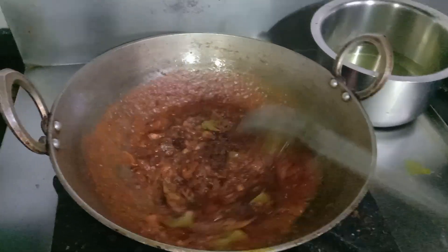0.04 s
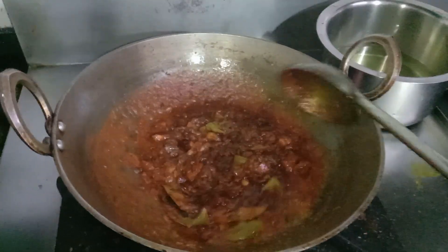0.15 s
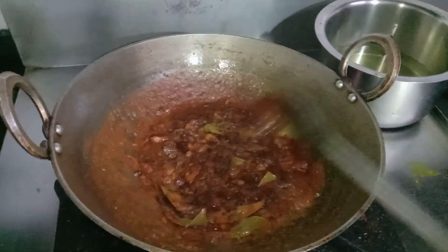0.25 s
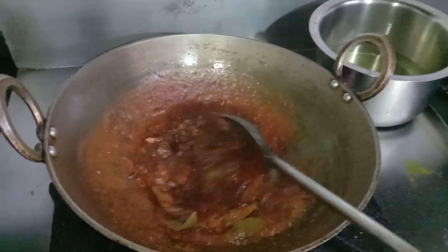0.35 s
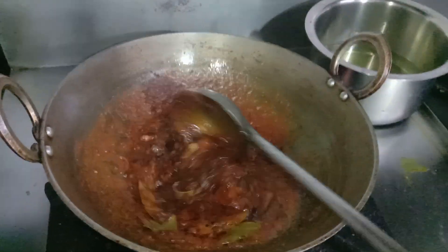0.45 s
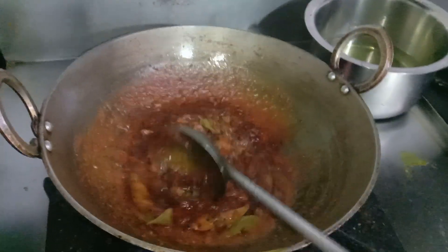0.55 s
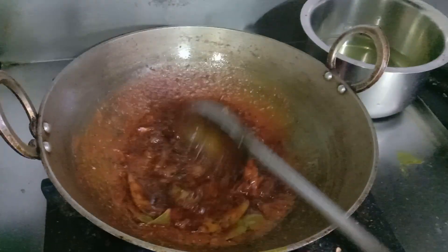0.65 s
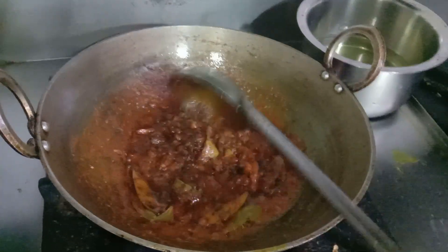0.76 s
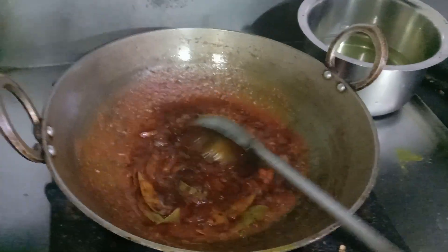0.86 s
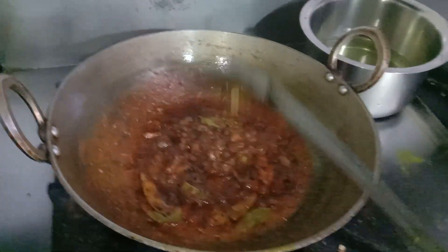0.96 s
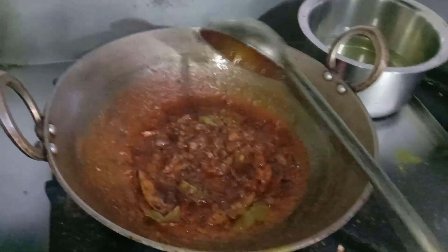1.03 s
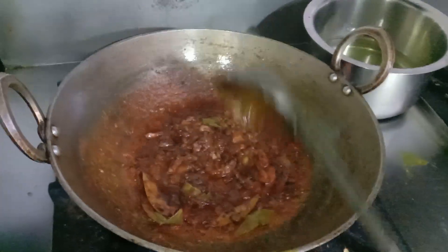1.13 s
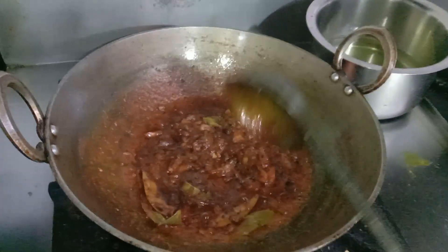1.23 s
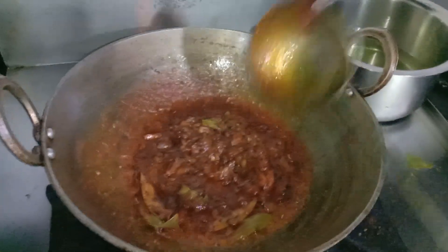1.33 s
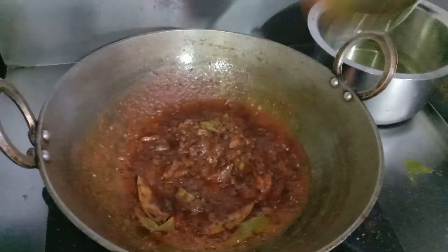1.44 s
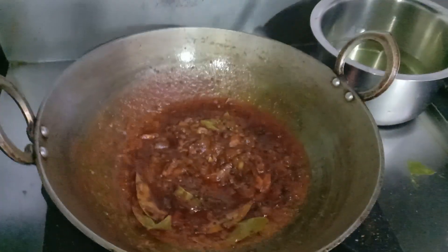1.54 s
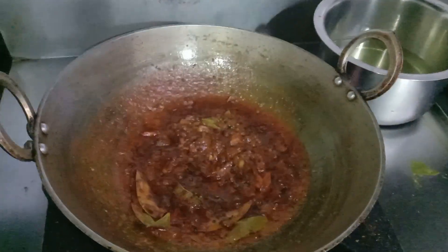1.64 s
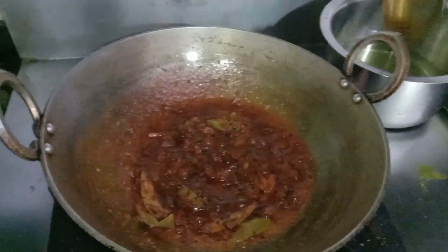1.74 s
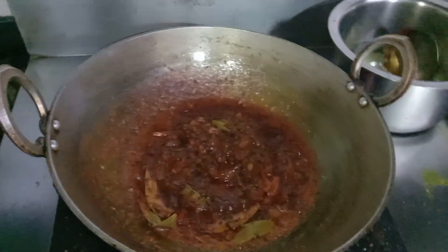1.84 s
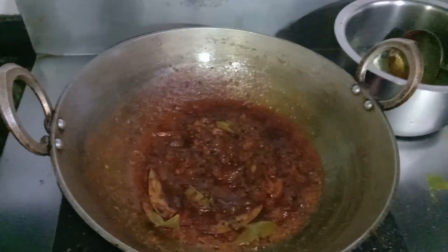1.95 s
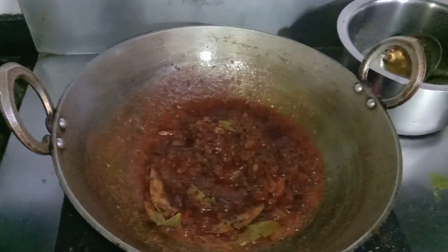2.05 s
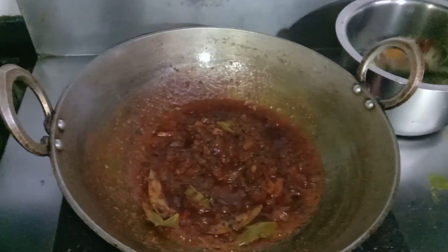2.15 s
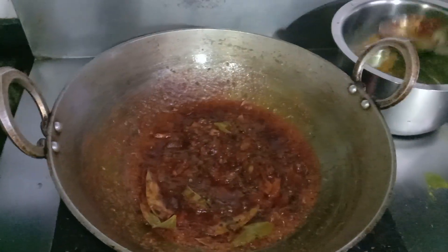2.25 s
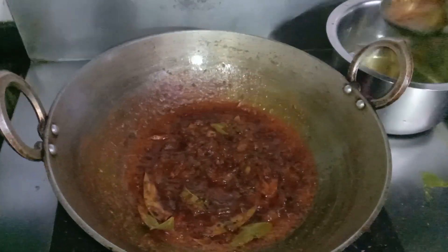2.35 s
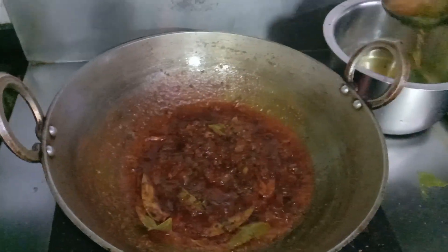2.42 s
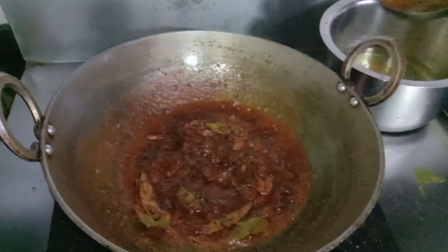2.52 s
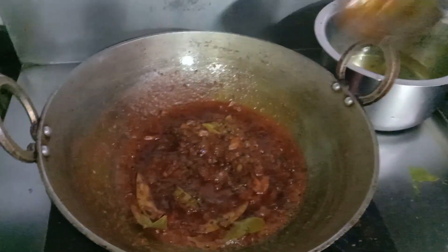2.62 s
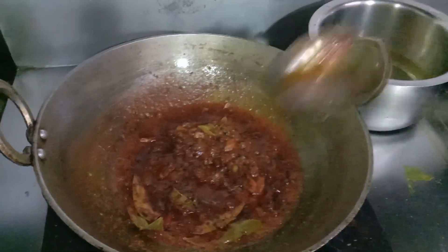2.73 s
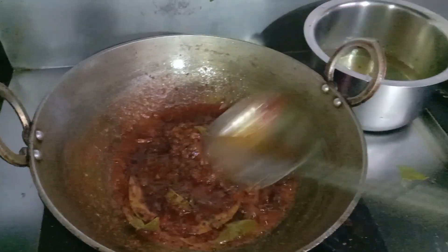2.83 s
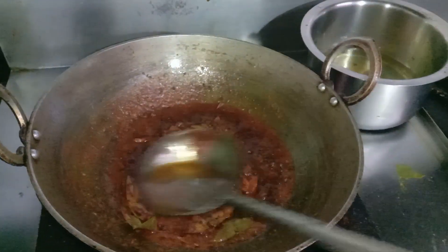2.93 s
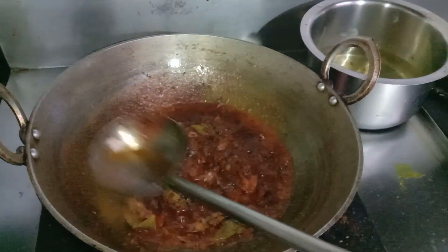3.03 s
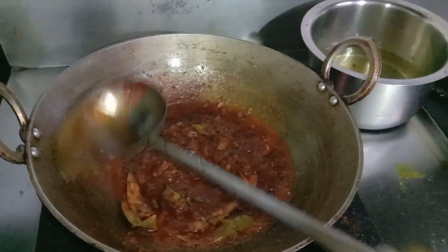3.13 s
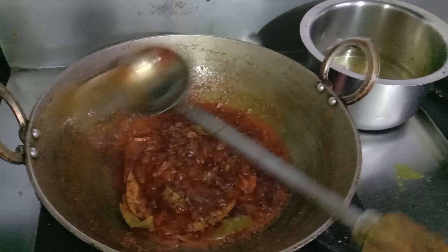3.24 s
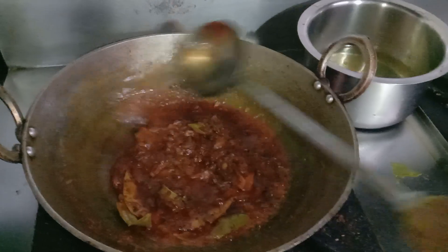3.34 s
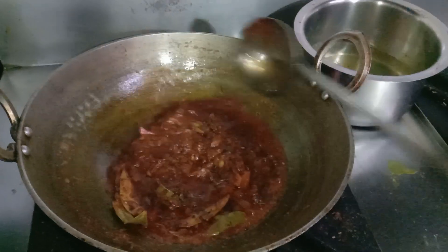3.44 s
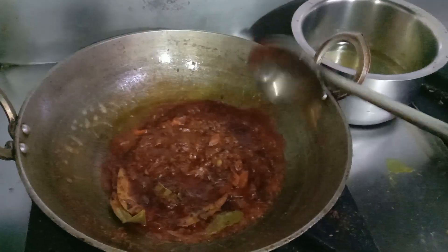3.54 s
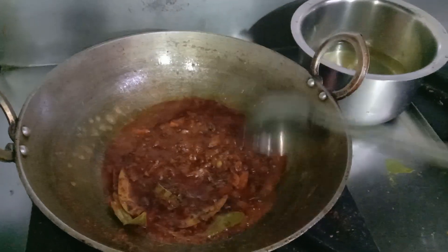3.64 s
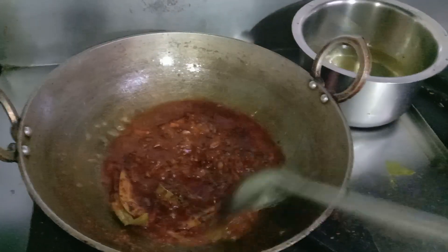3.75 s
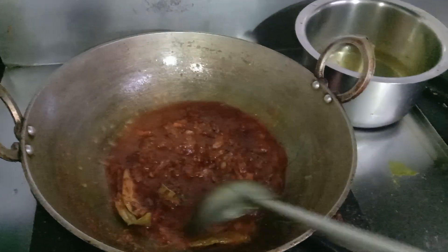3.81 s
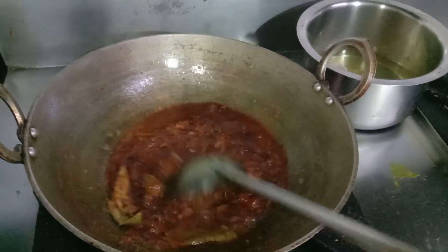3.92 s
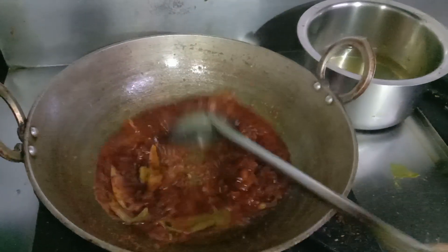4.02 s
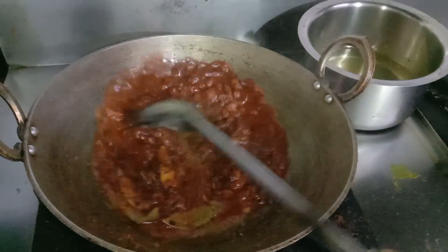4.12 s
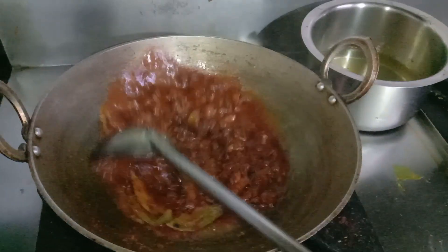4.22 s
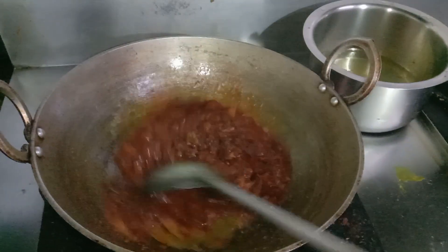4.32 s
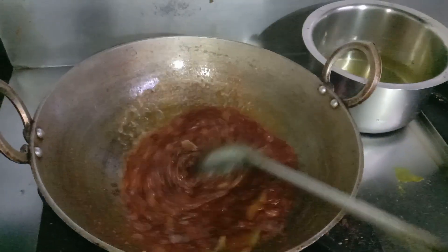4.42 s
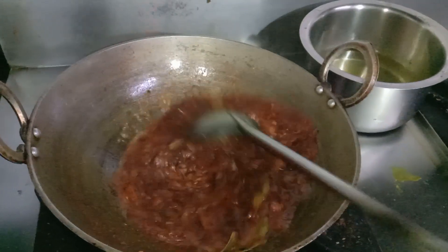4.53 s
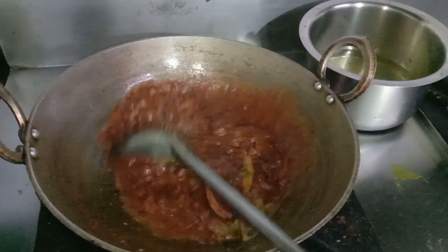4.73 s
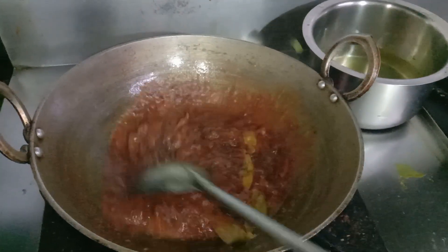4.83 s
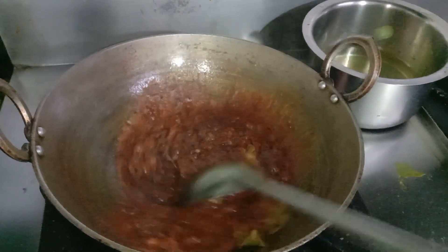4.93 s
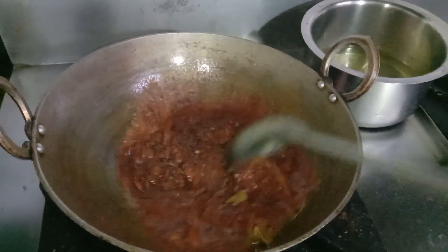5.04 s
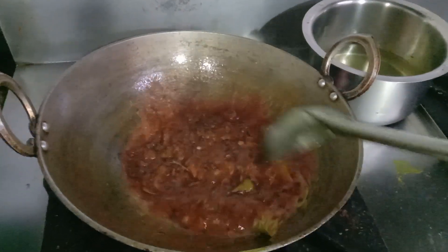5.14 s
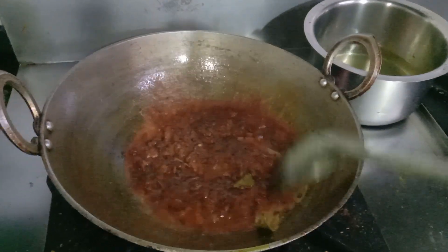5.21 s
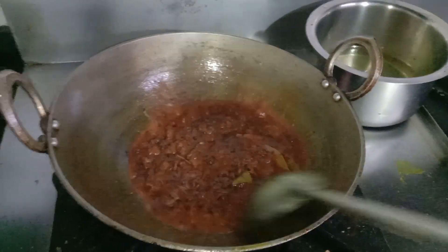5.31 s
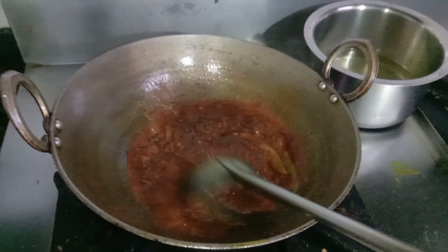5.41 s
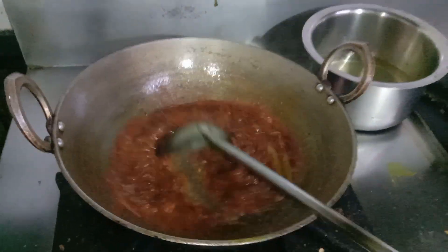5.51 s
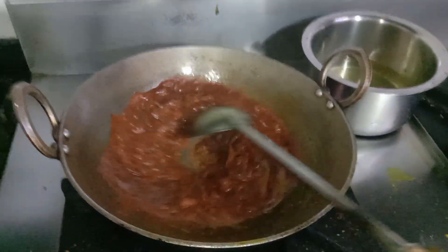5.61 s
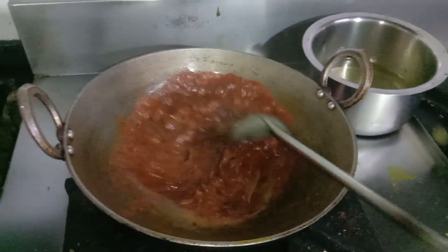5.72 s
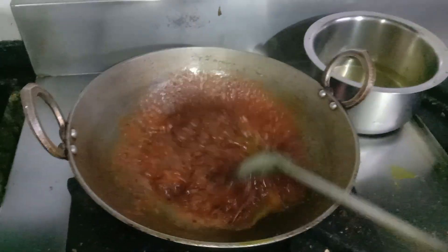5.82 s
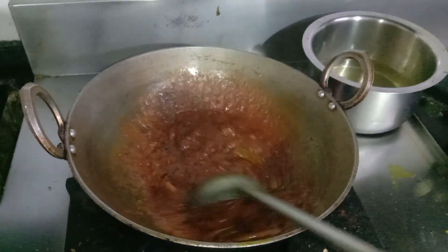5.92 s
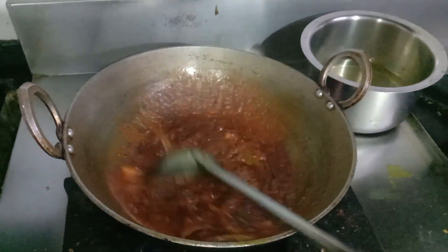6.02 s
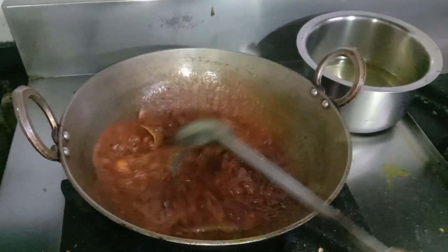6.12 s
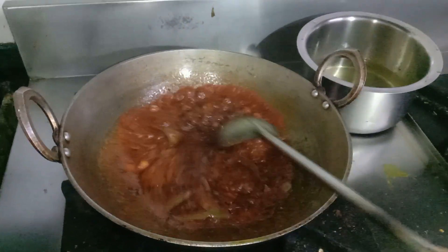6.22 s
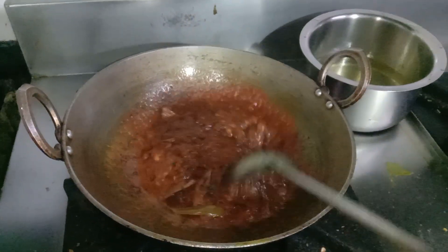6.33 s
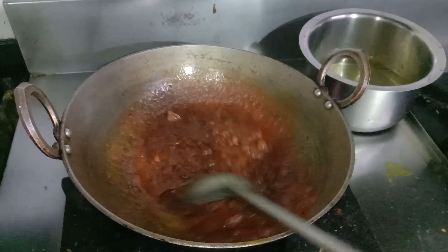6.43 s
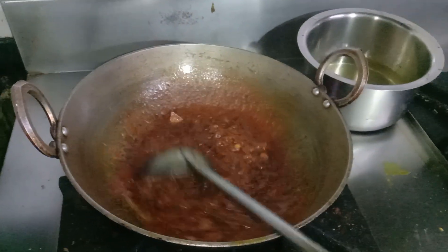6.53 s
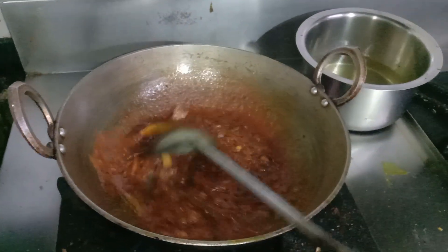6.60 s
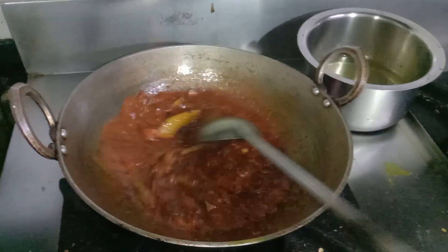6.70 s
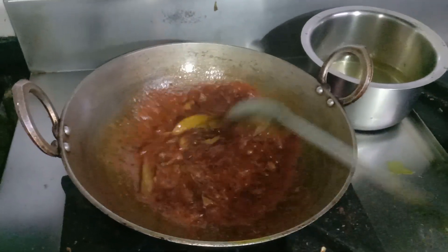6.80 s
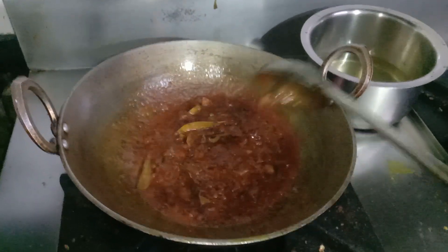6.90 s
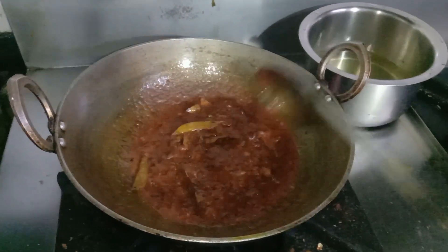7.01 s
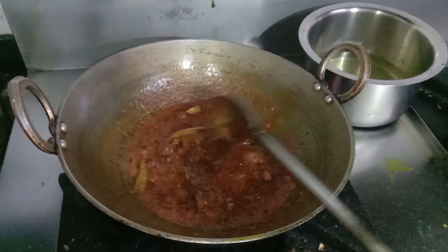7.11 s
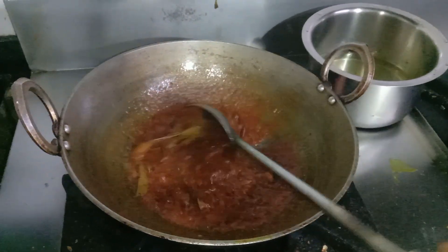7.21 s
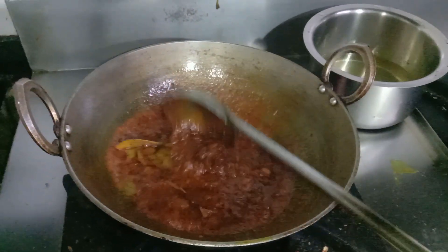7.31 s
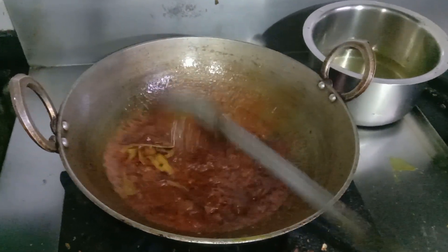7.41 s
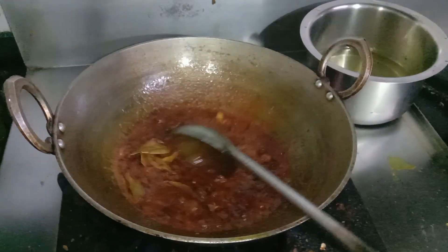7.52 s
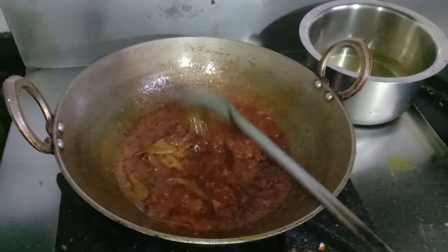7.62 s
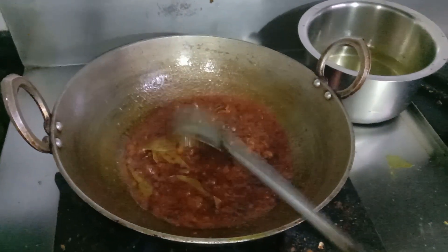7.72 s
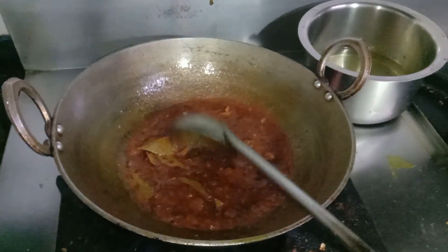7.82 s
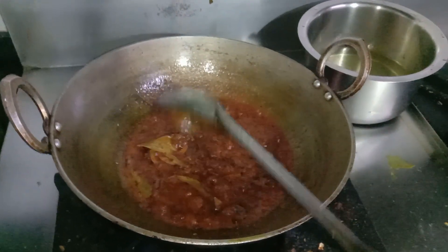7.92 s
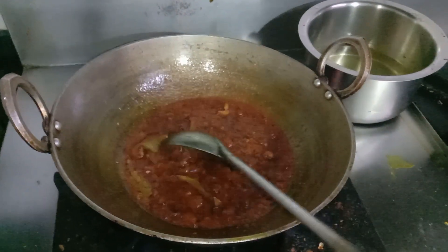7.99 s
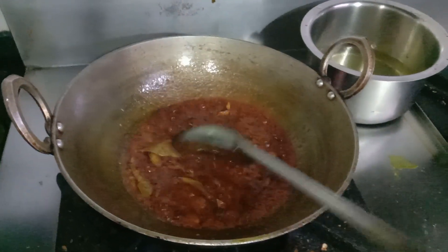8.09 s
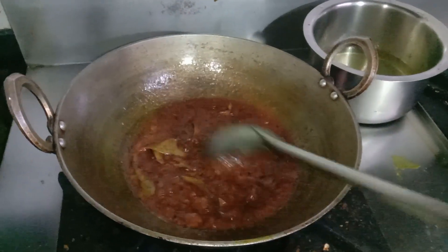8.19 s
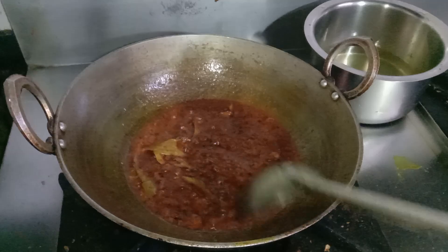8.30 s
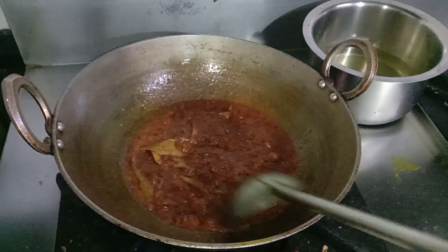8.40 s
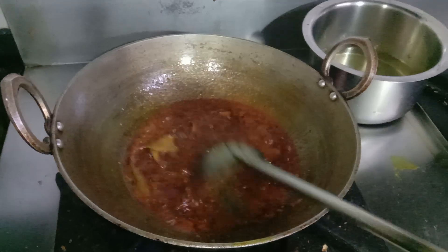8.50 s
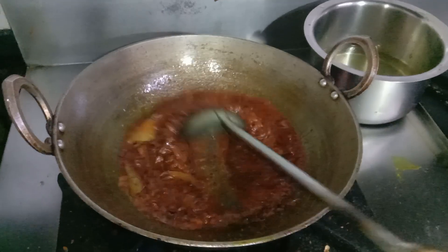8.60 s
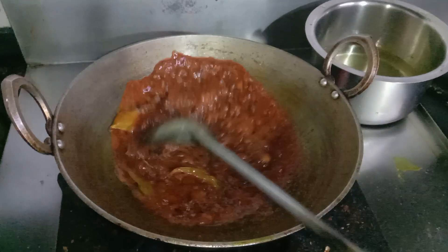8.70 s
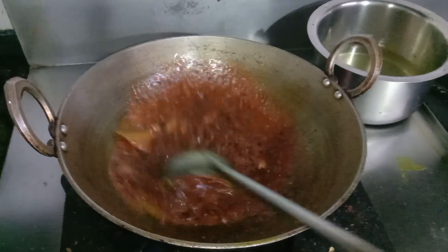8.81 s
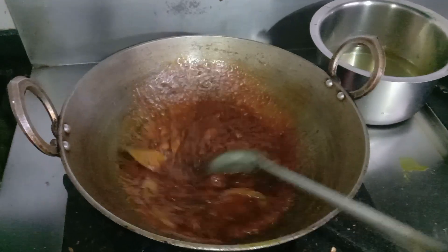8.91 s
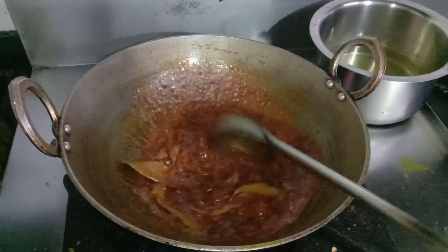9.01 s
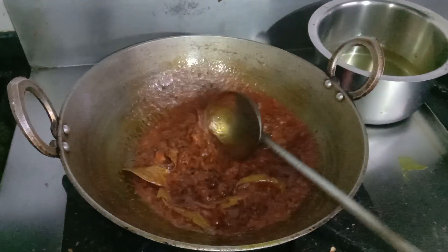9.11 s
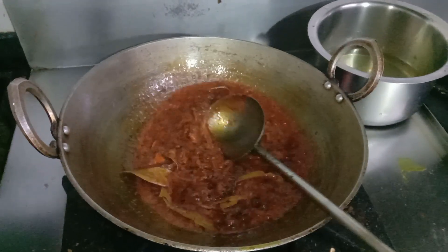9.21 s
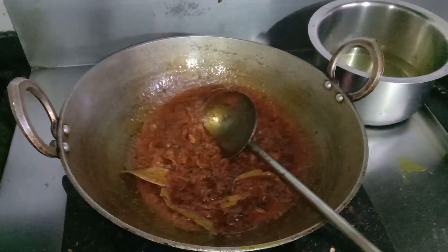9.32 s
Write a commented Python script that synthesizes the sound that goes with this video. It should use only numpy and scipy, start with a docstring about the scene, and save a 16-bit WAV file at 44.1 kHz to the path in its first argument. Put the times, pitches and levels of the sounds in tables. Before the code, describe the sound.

A steel ladle knocks against an iron wok over softly sizzling sauce, then lightly taps a steel pot. The sizzle swells as liquid meets the hot wall, and the ladle stirs with repeated dull knocks and scrapes. Near the end come several sharper, ringing taps and a few more strokes. A gas flame roars faintly underneath, all heard close by in a small kitchen.

```python
"""A dull knock on iron over sizzling: a steel ladle stirs sauce in a wok on a gas stove in a small kitchen.
Each impact excites the resonances of wok and stove top; a few leave the ladle's own modes ringing,
and its dragged rim scrapes by stick-slip friction. The ladle taps a steel pot, then liquid meets the
hot wall and the sizzle swells with bursting steam and ringing bubbles. The flame roars softly beneath."""
import sys
import numpy as np
from scipy import signal
from scipy.fft import rfft, irfft
from scipy.io import wavfile
from scipy.ndimage import uniform_filter1d

SR = 44100
rng = np.random.default_rng(int(sys.argv[2]) if len(sys.argv) > 2 else 0)


def transcribe(signal):
    """Save signal, clipped to [-1, 1], as a 16-bit WAV file at the path in sys.argv[1]."""
    frames = np.atleast_2d(signal).T
    limited = np.clip(frames, -1, 1)
    pcm = np.round(limited * 32767).astype(np.int16)
    wavfile.write(sys.argv[1], SR, pcm)


N = 412328
RING_T = np.arange(SR) / SR  # the one second that a blow lasts

# broad spectrum of the iron wok: frequency_hz, level_db
WOK_SPECTRUM = [(150, -35.5), (500, -20.5), (850, -6), (1100, -3), (1290, -1.5), (1500, -8.5),
                (1800, -11.5), (2600, -20), (4500, -83), (9000, -63)]
# resonances of the wok and its stand: pitch_hz, width_hz, peak_db
WOK_MODES = [(105, 18, 7), (348, 22, 4), (506, 50, 3), (590, 25, 4), (635, 38, 9.5), (785, 40, 9),
             (885, 30, 3), (990, 35, 5), (1071, 30, 5), (1245, 45, 6), (1305, 40, 8)]


def amp(db):
    """Decibels to amplitude ratio."""
    return 10 ** (np.asarray(db) / 20)


def unit_rms(x, first=None):
    """Normalises the rms of a signal, or of its first samples, to 1."""
    return x / np.sqrt(np.mean(x[:first] ** 2) + 1e-20)


def curve_at(points, hz):
    """Interpolation on a logarithmic frequency axis."""
    knots_hz, values = np.transpose(points)
    return np.interp(np.log(hz + 1), np.log(knots_hz + 1), values)


def add(mix, start_s, sound):
    """Superposition: a sound joins the mix at start_s."""
    part = mix[max(0, round(start_s * SR)):][:len(sound)]
    part += sound[:len(part)]


def colour(x, spectrum, modes=()):
    """Minimum-phase filtering by a broad spectrum with resonance peaks on top."""
    hz = np.fft.rfftfreq(8192, 1 / SR)
    peaks_db = sum(db / (1 + (2 * (hz - centre) / width) ** 2) for centre, width, db in modes)
    gain = amp(np.maximum(curve_at(spectrum, hz) + peaks_db, -100))
    cepstrum = irfft(np.log(gain))
    half = len(cepstrum) // 2
    causal = np.r_[cepstrum[0], 2 * cepstrum[1:half], np.zeros(half)]
    response = irfft(np.exp(rfft(causal)))[:half]
    return signal.oaconvolve(x, response)[:len(x)]


def soften(x, contact_hz):
    """Contact time limits bandwidth: a cushioned blow lasts longer and loses its treble."""
    return colour(x, [(contact_hz, 0), (2 * contact_hz, -11), (4 * contact_hz, -25)])


def decay(t60_s):
    """Exponential damping, 60 dB in t60_s."""
    return amp(-60 * RING_T / t60_s)


def ring(modes):
    """Free vibration: a sum of damped modes whose shares vary with where the blow lands."""
    draws = rng.random((len(modes), 2))
    return sum(amp(db) * (.5 + share) * decay(t60_s) * np.sin(2 * np.pi * (hz * RING_T + phase))
               for (hz, db, t60_s), (share, phase) in zip(modes, draws))


def pops(per_s, spread_db):
    """Shot noise: random clicks; spread_db makes a few much larger than the rest."""
    strength = amp(spread_db * np.minimum(rng.exponential(1, N), 6))
    return unit_rms(strength * rng.choice([-1, 1], N) * (rng.random(N) < per_s / SR))


def wander(depth_db, samples):
    """Random amplitude modulation: a gain that drifts over about this many samples."""
    drift = uniform_filter1d(rng.standard_normal(N), samples)
    return amp(depth_db * unit_rms(uniform_filter1d(drift, samples // 2)))


def kitchen(x):
    """Reverberation: dense reflections off hard walls die at a rate that depends on frequency."""
    # reverberation time: frequency_hz, t60_s
    decay_times = [(100, 0.84), (600, 0.55), (1300, 0.95), (3000, 0.51), (7000, 0.75), (15000, 0.51)]
    reflections = rng.standard_normal(SR) * (rng.random(SR) < .06) * (RING_T > .008)
    hz, t, spectra = signal.stft(reflections, SR, nperseg=256)
    absorption = amp(-60 * t / curve_at(decay_times, hz)[:, None])
    tail = signal.istft(spectra * absorption, SR, nperseg=256)[1]
    return signal.fftconvolve(x, tail / np.linalg.norm(tail))[:N]


def burner(level_db=-49.5):
    """Combustion noise: the soft, steady roar of the gas flame."""
    # flame spectrum: frequency_hz, level_db
    flame_spectrum = [(15, -61), (25, -32), (60, -12.5), (147, -2), (220, -18.5), (240, -17.5), (334, -9),
                      (384, -24), (426, -13), (636, -7), (917, -39), (1070, -7), (1600, -13.5), (2080, -34),
                      (3520, -120)]
    return amp(level_db) * unit_rms(colour(rng.standard_normal(N), flame_spectrum))


def bubbling():
    """Bubble resonance: each size rings at its own pitch for about ten cycles, rising slightly."""
    out = np.zeros(N)
    for hz in np.geomspace(1500, 6500, 32):
        cycles = hz * RING_T[:800]
        blip = np.sin(2 * np.pi * cycles * (1 + .003 * cycles)) * np.exp(-cycles / 7)
        births, onsets = np.zeros(N), rng.integers(0, N, size=2500)
        births[onsets] = amp(2.2 * np.minimum(rng.exponential(1, len(onsets)), 5))
        out += signal.oaconvolve(births, unit_rms(blip))[:N]
    return unit_rms(out)


def bubble_clusters(x, depth_db):
    """Spectral modulation: passing clusters of bubbles of one size lift narrow bands for a moment."""
    spectra = signal.stft(x, nperseg=1024, noverlap=768)[2]
    patches = uniform_filter1d(rng.standard_normal(spectra.shape), size=5, axis=0)
    patches = uniform_filter1d(patches, size=9, axis=1)
    spectra *= amp(depth_db * unit_rms(patches))
    return unit_rms(signal.istft(spectra, nperseg=1024, noverlap=768)[1][:N])


def wetness(start_s, spread_s, drying_db_per_s):
    """Evaporation: a patch of liquid spreads over the hot iron, then boils away."""
    t = np.arange(N) / SR - start_s
    return np.clip(t / spread_s, 0, 1) * amp(-drying_db_per_s * np.maximum(t - spread_s, 0))


def frying_envelopes():
    """Incoherent sources add in power: each wet patch raises the boil and the fizz above a simmer."""
    # liquid poured or pushed up the hot wall: start_s, spread_s, boil_db, fizz_db, drying_db_per_s
    wettings = [(-.2, 0.18, -38, -40.5, 7.5), (1.2, .55, -49, -52, 8), (3.21, 0.27, -33, -40.5, 3.5),
                (3.92, 0.4, -32, -41.5, 6), (5.42, .4, -38.5, -42.5, 9.5), (6.9, .12, -42.5, -49, 20),
                (8.44, 0.14, -40.5, -45, 20), (8.83, 0.092, -44, -47, 21)]
    boil_lag_s = .074  # the oil spits at once, the sauce boils up a moment later
    boil_power, fizz_power = amp(-51) ** 2, amp(-62) ** 2  # the simmer
    for start_s, spread_s, boil_db, fizz_db, drying in wettings:
        boil_power += (amp(boil_db) * wetness(start_s + boil_lag_s, spread_s, drying)) ** 2
        fizz_power += (amp(fizz_db) * wetness(start_s, spread_s, drying)) ** 2
    return np.sqrt(boil_power), np.sqrt(fizz_power)


def sizzle():
    """Boiling noise: steam crackles and bubbles through the sauce; finer bursts fizz in the oil."""
    # spectra of the boiling sauce and the spitting oil: frequency_hz, level_db
    sauce_spectrum = [(530, -25.5), (900, -2), (1020, -6), (1270, 1), (1550, -14.5), (2240, -3.5),
                      (2830, -8.5), (3510, -9.5), (4400, -18.5), (5210, -10), (5780, -11), (6290, -19),
                      (8500, -32.5), (11000, -47), (18700, -120)]
    oil_spectrum = [(3000, -24), (5300, -22), (6600, -9), (8200, -13), (9400, -1), (10700, 3), (12000, -2),
                    (13700, -9), (15000, -4), (16000, -2.5)]
    # the wok resonance that the frying drives: pitch_hz, width_hz, peak_db
    wok_hum = [(1260, 61, 3)]
    crackle = (pops(7000, spread_db=2) + .79 * bubbling()) * wander(.38, samples=1800)
    sauce = unit_rms(colour(bubble_clusters(crackle, depth_db=2.3), sauce_spectrum, wok_hum))
    spray = pops(8000, spread_db=2) * wander(1, samples=3000)
    oil = unit_rms(colour(bubble_clusters(spray, depth_db=2), oil_spectrum))
    boil, fizz = frying_envelopes()
    return boil * sauce + amp(3.5) * fizz * oil


def scrape():
    """Stick-slip friction: tiny slips of the ladle's rim excite the wok in uneven clumps."""
    # drags of the rim over the iron: start_s, length_s, level_db
    drags = [(0, 0.68, -48), (3.834, 1.7, -32.5), (5.349, 1.4, -34.5), (7.05, .35, -40), (7.6, .6, -44),
             (8.35, 0.18, -22.5), (8.613, .14, -37.5), (9.09, 0.2, -38.5)]
    attack_s, ease_db_per_s, release_s = .05, 4.5, .084  # the hand presses, eases off and lifts
    pressure = np.zeros(N)
    for start_s, length_s, level_db in drags:
        t = np.maximum(np.arange(N) / SR - start_s, 0)
        lift = np.exp(-np.maximum(t - length_s, 0) / release_s)
        pressure += np.minimum(t / attack_s, 1) * amp(level_db - ease_db_per_s * t) * lift
    slips = pops(2500, spread_db=0) * wander(2.1, samples=900)
    return pressure * unit_rms(colour(slips, WOK_SPECTRUM, WOK_MODES + [(1249, 84, 9.6)]))


def rocking(samples=1500):
    """Oscillation about equilibrium: a few soft, low cycles as the wok settles."""
    # the wok rocks on its stand: start_s, level_db, pitch_hz
    rocks = [(0.073, -31.5, 145), (0.57, -33, 152), (0.843, -30.5, 124), (5.326, -26, 131)]
    out = np.zeros(N)
    for start_s, level_db, pitch_hz in rocks:
        sway = np.sin(2 * np.pi * pitch_hz * RING_T[:samples]) * signal.windows.hann(samples)
        add(out, start_s, amp(level_db) * sway)
    return out


def struck_modes():
    """Modal excitation: each point of impact drives the wok's resonances in different shares."""
    shares = rng.uniform(.3, 1.6, len(WOK_MODES))
    return [(hz, width, db * share) for (hz, width, db), share in zip(WOK_MODES, shares)]


def thud(bass_db):
    """Structure-borne sound: the wok chatters on its stand and the stove top booms."""
    # stove top spectrum: frequency_hz, level_db
    stove_spectrum = [(35, -34), (70, -10), (100, -4.5), (210, -2.5), (320, 0.5), (560, -1), (850, -2),
                      (1150, -1.5), (1500, -44), (2500, -25), (5000, -54)]
    chatter = rng.standard_normal(SR) * (decay(.12) + .84 * decay(.82)) * (1 - decay(.0091))
    weighted = colour(chatter, [(170, bass_db), (520, 0)])
    return unit_rms(colour(weighted, stove_spectrum, struck_modes()), first=2200)


def stove_bumps():
    """Soft contacts excite mainly low modes: the stove top booms faintly."""
    # bumps while the ladle is at the side pot: start_s, level_db
    bumps = [(1.848, -42.5), (2.43, -47.5), (2.92, -51)]
    out = np.zeros(N)
    for start_s, level_db in bumps:
        add(out, start_s, amp(level_db) * soften(thud(bass_db=5.5), contact_hz=300))
    return out


def pot():
    """Impact excitation: the dipping ladle bumps the side pot and sets its modes ringing."""
    # taps on the pot: start_s, ring_db, bump_db
    taps = [(1.881, -47, -33), (1.897, -34, -47), (2.049, -32, -40)]
    # modes of the steel pot: pitch_hz, level_db, t60_s
    pot_modes = [(735, -6.5, 0.33), (792, -8, 0.58), (1195, -9.5, 0.47), (1510, -11, .12), (1925, 3, .38),
                 (1984, -4, 0.28), (1990, -19, .15), (2250, -13, 0.7)]
    out = np.zeros(N)
    for start_s, ring_db, bump_db in taps:
        bump = unit_rms(colour(rng.standard_normal(SR), WOK_SPECTRUM)) * decay(.25)
        ringing = unit_rms(ring(pot_modes), first=900)
        add(out, start_s, amp(ring_db) * ringing + amp(bump_db) * bump)
    return out


def ladle():
    """Mode splitting: the ladle rings freely, and its uneven bowl gives each partial a detuned twin."""
    # modes of bowl and shaft: pitch_hz, level_db, t60_s
    ladle_modes = [(1690, 2, .4), (1965, -3, .5), (2492, -10, .5), (2697, -12, .5), (3031, 2, .75),
                   (3052, -1, .7), (3183, -1, .4), (3451, -8, .4), (3790, -9, .8), (3960, -9, .7),
                   (4176, -7, .7), (4235, -7, .7), (4310, -6, .6), (4645, -4, .75), (4815, -7, .7),
                   (5100, -7, .55), (5630, -8, .7), (5792, -4, .6), (5930, -7, .5), (6115, -8, .6),
                   (6250, -8, .45), (6730, -10, .5), (7300, -15, .4)]
    # rebounds, each favouring partials around a centre: start_s, level_db, centre_hz, spread_octaves
    rebounds = [(1.18, -30, 3000, .6), (6.941, -42, 5000, .8), (7.74, -29, 4200, .5),
                (7.986, -27.5, 3500, .33), (8.334, -23, 4900, .33), (9.208, -45, 4500, .5)]
    # bands that the bowl beams separately: low_hz, high_hz
    beam_bands = [(1700, 3600), (3600, 5000), (5000, 8000)]
    twin_detune, twin_db = .025, -3
    out = np.zeros(N)
    for start_s, level_db, centre_hz, spread_octaves in rebounds:
        modes = [(hz, db - 2 * (np.log2(hz / centre_hz) / spread_octaves) ** 2, t60_s)
                 for hz, db, t60_s in ladle_modes]
        twins = [(hz * (1 + twin_detune * rng.uniform(-1, 1)), db + twin_db, t60_s)
                 for hz, db, t60_s in modes]
        add(out, start_s, amp(level_db) * unit_rms(ring(modes + twins), first=1300))
    # directivity: waving in the hand, the bowl beams each band past the listener by turns
    filters = [signal.butter(2, edges, "band", fs=SR, output="sos") for edges in beam_bands]
    return sum(signal.sosfilt(band, out) * wander(2, samples=1100) for band in filters)


def clang(contact_hz, shiver_db):
    """Viscous damping: the sauce stops the wok within a few cycles; its bare wall shivers on."""
    push = signal.unit_impulse(SR) + .16 * rng.standard_normal(SR) * decay(.031)
    body = colour(push, WOK_SPECTRUM, [(1278, 230, 8.1)])
    blow = unit_rms(soften(body, contact_hz), first=530)
    wall = unit_rms(colour(rng.standard_normal(SR), WOK_SPECTRUM, struck_modes()))
    shiver = wall * decay(.7) * (1 - decay(.056))
    return blow + amp(shiver_db) * soften(shiver, contact_hz)


def clonk(contact_hz, pitch_hz=638.3, rise_s=.007):
    """Mass loading: the laden wok has a hollow note, which takes more of the push from a softer contact."""
    hz = pitch_hz * (1 + .05 * rng.uniform(-1, 1))  # the sloshing load shifts the note
    tone = np.sqrt(2) * np.sin(2 * np.pi * (hz * RING_T + rng.random()))
    swell = (1 - np.exp(-RING_T / rise_s)) * decay(.16)
    return pitch_hz / contact_hz * swell * tone


def clink(contact_hz):
    """A brief contact has a wide spectrum: steel on iron gives a bright crack and a short shimmer."""
    # spectrum of bare steel: frequency_hz, level_db
    steel_spectrum = [(500, -32), (1400, 0.5), (2500, 4), (3200, -2.5), (4400, -0.5), (5500, 0.5),
                      (6800, -4.5), (8300, -12), (10500, -3.5), (13500, -9), (15500, -5.5)]
    # resonances: pitch_hz, width_hz, peak_db
    peaks = [(1680, 130, 9), (2450, 120, 5), (3170, 220, 12), (4200, 150, 5),
             (5130, 200, 8), (6250, 150, 6), (10400, 400, 7)]
    crack = rng.standard_normal(SR) * (decay(.065) + .13 * decay(.86))
    return unit_rms(soften(colour(crack, steel_spectrum, peaks), contact_hz), first=660)


def strokes():
    """Cushioned impact: the ladle knocks wok and stove through the sauce, then touches once more."""
    # stirring strokes: start_s, clang_db, thud_db, contact_hz, bass_db
    stirs = [ (0.001, -23, -24.5, 960, -5), (0.566, -41, -36, 1400, 12), (0.835, -31, -33.5, 1310, 5),
             (3.582, -36, -32, 1200, -12), (4.074, -25, -30, 1700, 2), (4.463, -18, -23.5, 796, -3.5),
             (4.708, -31, -29.5, 1200, 1.5), (4.987, -19.5, -26.5, 800, -4.5),
             (5.329, -20.5, -34, 1800, 11), (5.566, -20, -27, 1800, -4), (5.858, -20, -23, 1250, -9),
             (6.137, -20.5, -29, 1220, -0.5), (6.34, -23, -26, 1000, -0.5),
             (6.648, -22.5, -32.5, 1280, 2.5), (8.634, -19, -28.5, 1600, 0),
             (8.826, -28.5, -39.5, 1470, -16), (8.865, -28, -49, 1760, 0), (8.978, -19, -21.5, 1000, -5)]
    shiver_db, retouch_db = -16.5, -17
    out = np.zeros(N)
    for start_s, clang_db, thud_db, contact_hz, bass_db in stirs:
        rise_s = .003 * (1000 / contact_hz) ** 3  # a softer contact gives way more slowly
        cushion = 1 - np.exp(-RING_T / rise_s)
        wok = clang(contact_hz, shiver_db) + clonk(contact_hz)
        add(out, start_s, cushion * (amp(clang_db) * wok + amp(thud_db) * thud(bass_db)))
        retouch_s = start_s + rng.uniform(.025, .08)
        add(out, retouch_s, amp(clang_db + retouch_db) * cushion * clang(contact_hz, shiver_db))
    return out


def strikes(bounce_s=.019):
    """Elastic impact: bare steel cracks on the iron, drives wok and stove, and bounces once."""
    # hard hits: start_s, clang_db, thud_db, bass_db, clink_db, contact_hz, bounce_db
    hits = [ (0.171, -32.5, -33, 2.5, -24, 10800, -51), (1.18, -17, -21.5, -8, -17.5, 7400, -20),
            (3.499, -16, -26.5, -8, -22, 5300, -25), (3.736, -13, -25.5, -4.5, -22.5, 5300, -18.5),
            (5.271, -20, -35, 1, -19.5, 7500, -15.5), (6.941, -24, -26.5, 1.5, -20, 15000, -32),
            (7.4724, -14, -24, 1.5, -32, 2200, -39), (7.74, -9, -19.5, -3.5, -23.5, 4770, -38),
            (7.9861, -7.5, -21.5, -2, -23, 2900, -32), (8.334, -10.5, -35.5, -10, -17.5, 6700, -19),
            (8.406, -14, -35, 2, -29, 2400, -26), (9.208, -34, -36, -4, -31, 3800, -40)]
    out = np.zeros(N)
    for start_s, clang_db, thud_db, bass_db, clink_db, contact_hz, bounce_db in hits:
        iron = amp(clang_db) * clang(contact_hz, shiver_db=-36.5) + amp(thud_db) * thud(bass_db)
        add(out, start_s, iron + amp(clink_db) * clink(contact_hz))
        # the ladle falls back more softly and judders on the wall
        add(out, start_s + bounce_s, amp(bounce_db) * clang(contact_hz=1330, shiver_db=-4.5))
    return out


def scene():
    """Superposition: the blows and their reflections sound over ringing, scraping, frying and flame."""
    blows = strokes() + strikes() + pot() + stove_bumps() + rocking()
    mix = blows + amp(-10) * kitchen(blows) + ladle() + scrape() + sizzle() + burner()
    add(mix, .0175, amp(-21) * blows)  # early reflection from the ceiling
    return mix[None]


def record(dry):
    """Peak limiting: the hardest knocks clip until the gain ducks and slowly recovers; then a band limit."""
    ceiling, release_db_per_s = .88, 24
    low_hz, high_hz = 45, 15750
    over_db = np.maximum(20 * np.log10(abs(dry[0]) / ceiling + 1e-9), 0)
    release_db = release_db_per_s * np.arange(N) / SR
    held_db = np.maximum.accumulate(over_db + release_db) - release_db
    ducked = dry * amp(-signal.lfilter([.01], [1, -.99], held_db))  # attack of about 2 ms
    clipped = ducked / (1 + (ducked / ceiling) ** 8) ** (1 / 8)
    highpass = signal.butter(2, low_hz, "high", fs=SR, output="sos")
    lowpass = signal.firwin(511, high_hz, window=("kaiser", 9), fs=SR)
    return signal.oaconvolve(signal.sosfilt(highpass, clipped), lowpass[None], "same")


dry = scene()
out = record(dry)
transcribe(out)
```